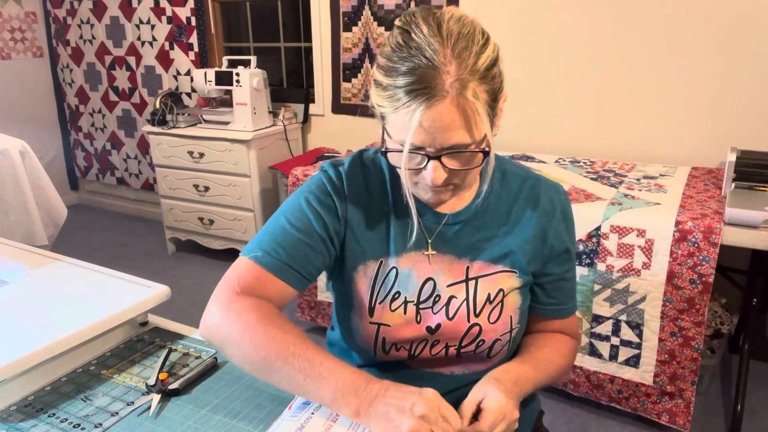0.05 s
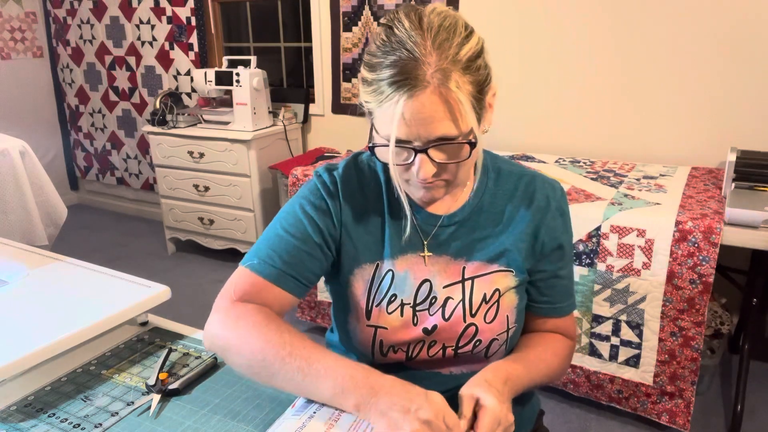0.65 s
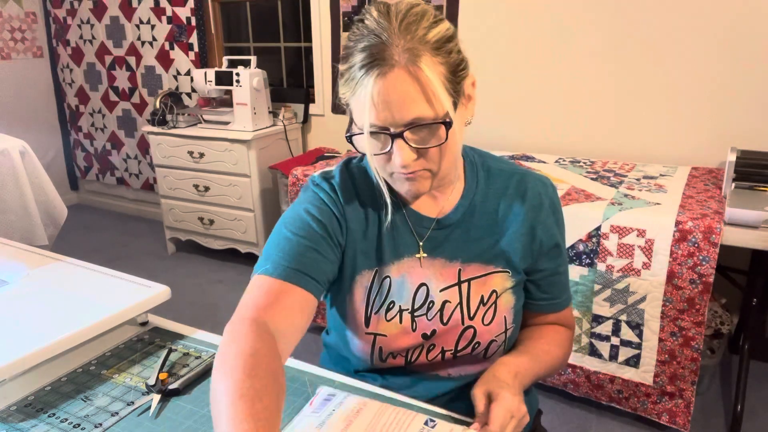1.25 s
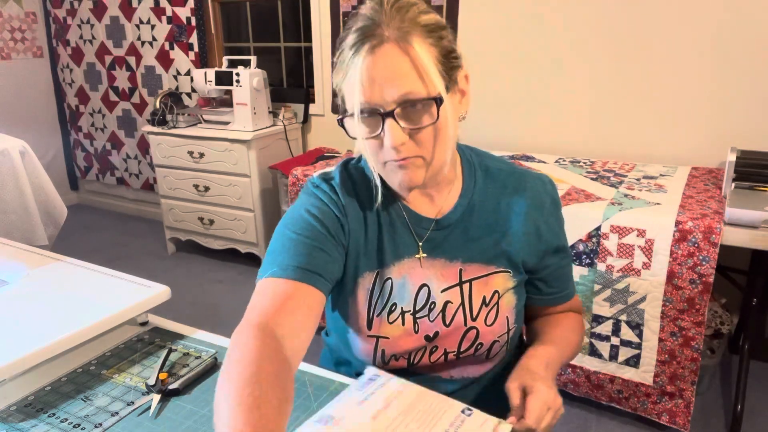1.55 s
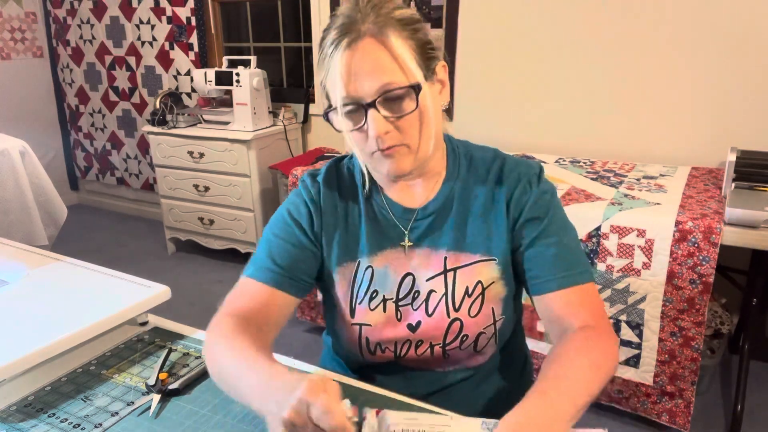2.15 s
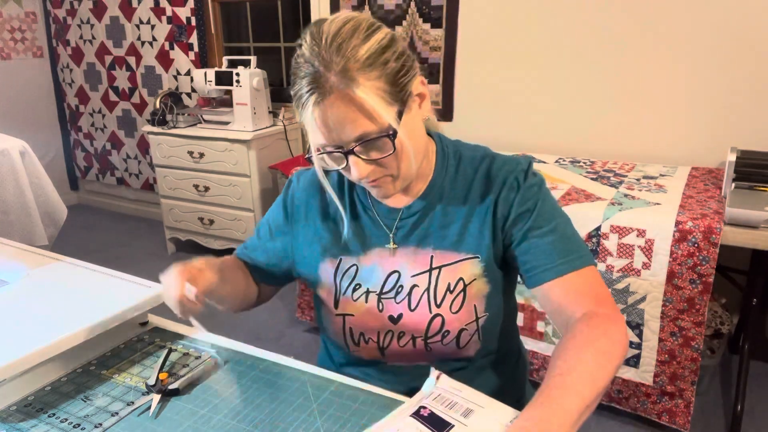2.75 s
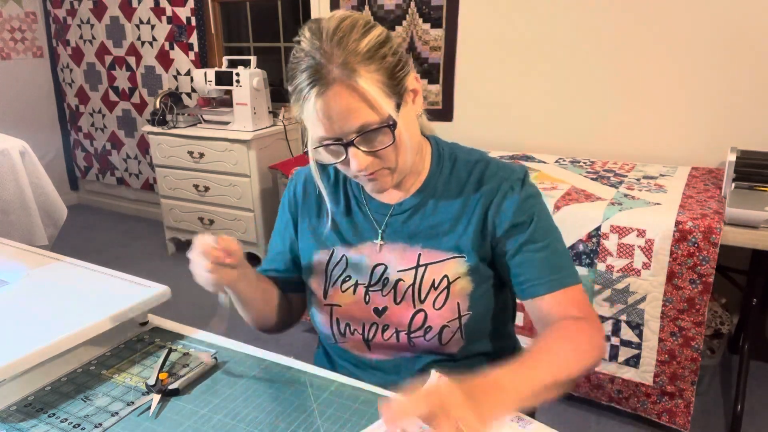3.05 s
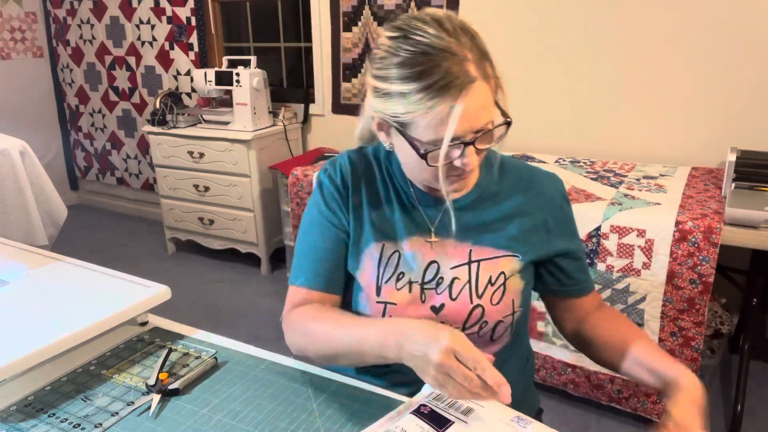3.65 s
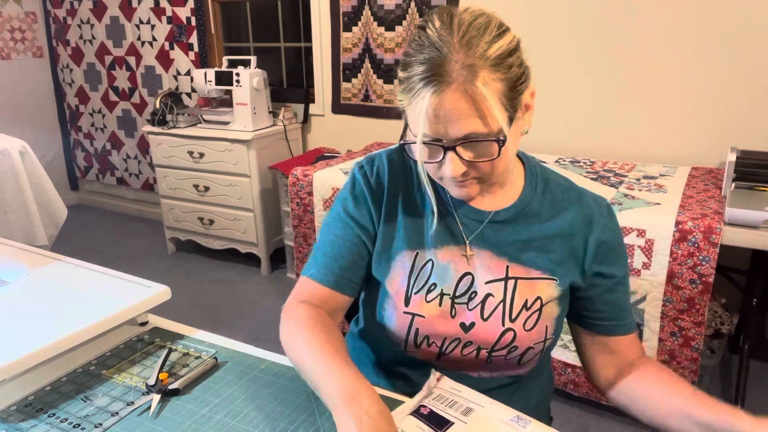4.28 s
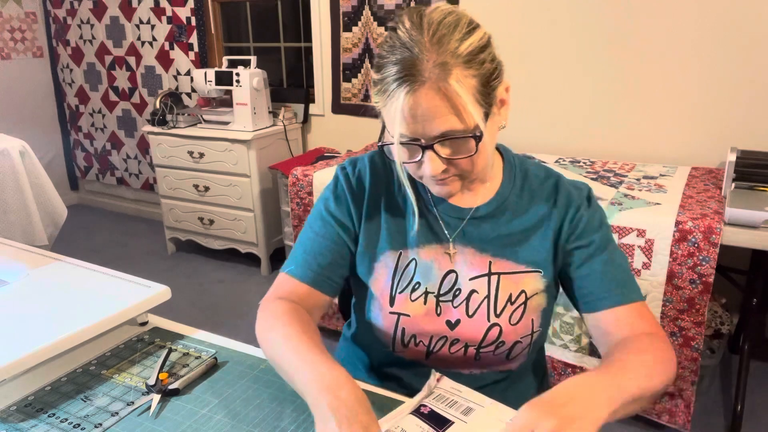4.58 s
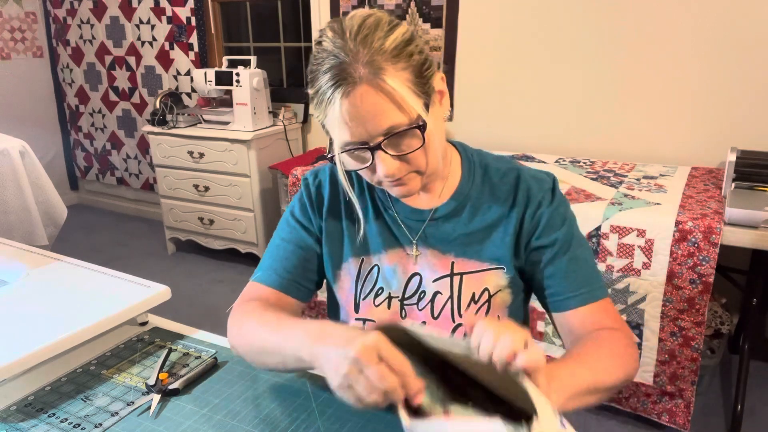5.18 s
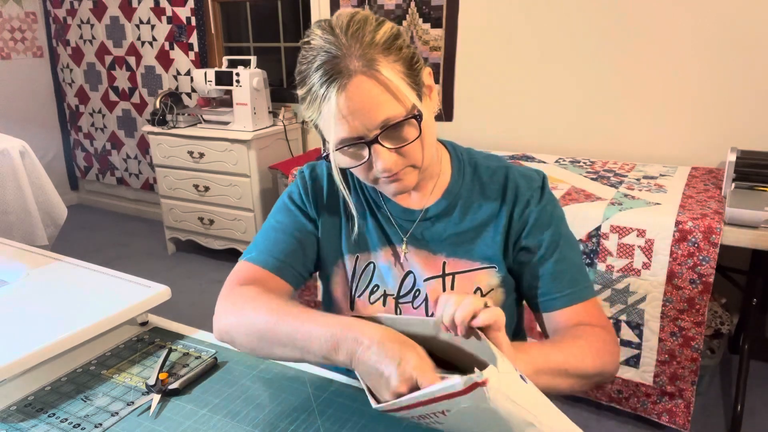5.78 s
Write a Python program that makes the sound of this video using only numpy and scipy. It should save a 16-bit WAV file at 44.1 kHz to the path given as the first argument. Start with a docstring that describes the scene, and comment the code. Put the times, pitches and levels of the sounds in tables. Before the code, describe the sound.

Close microphones in a small, quiet room pick up a stiff paper mailer being handled. It rustles, scrapes over a mat and is turned, bumping the table. One short, crackling rip with a zipping ring removes the tear strip. After a lull with a few light ticks, a hand lands on the table, then the paper crackles and pops hollowly as fingers work it open.

```python
"""Fingers rub a stiff paper mailing envelope, slide it across a cutting mat and turn it.
They draw its tear strip taut and rip it off in one pull, which sets the strip ringing.
Next the strip is crumpled, and a hand lands on the table with a thud and a fingernail click.
Last, fingers pry the envelope open: its creases snap and its walls buckle with hollow pops.
All this is heard in a small furnished room, through two microphones set close together."""
import sys
import numpy as np
from scipy import signal
from scipy.fft import rfft, irfft
from scipy.io import wavfile
from scipy.ndimage import uniform_filter1d

SR = 44100
rng = np.random.default_rng(int(sys.argv[2]) if len(sys.argv) > 2 else 0)


def generate_wav(signal):
    """Clip the signal to [-1, 1] and save it as 16-bit WAV at the path in sys.argv[1]."""
    frames = np.transpose(np.atleast_2d(signal))
    scaled = np.clip(frames, -1, 1) * 32767
    pcm = np.round(scaled).astype(np.int16)
    wavfile.write(sys.argv[1], SR, pcm)


N = 261072
TIME = np.arange(N) / SR
BINS = np.arange(N // 2 + 1) * SR / N
BODY_TOP_HZ, HISS_FROM_HZ, CUTOFF_HZ = 400, 5000, 15900   # three bands: low body, middle rasp, high hiss


def from_db(db):
    """Turn decibels into a gain."""
    return 10 ** (np.asarray(db) / 20)


def rms_one(x):
    """Scale a sound to an average strength (rms) of 1."""
    return x / np.sqrt(np.mean(x ** 2) + 1e-20)


def add(out, s, sound):
    """Mix a sound in at s seconds."""
    i = int(s * SR)
    out[i:i + len(sound)] += sound[:N - i]


def gains_in_time(rows):
    """Make one gain curve per dB column, silent outside the rows."""
    s, *columns = np.transpose(rows)
    return [from_db(np.interp(TIME, s, c, left=-150, right=-150)) for c in columns]


def at_hz(points, hz):
    """Read every column of a table on a log-frequency axis."""
    f, *columns = np.transpose(points)
    return [np.interp(np.log(hz + 1), np.log(f), c) for c in columns]


def butter(x, hz, kind, order=2):
    """Keep the lows, the highs or one band of a sound."""
    sections = signal.butter(order, np.clip(hz, 10, .45 * SR), kind, fs=SR, output="sos")
    return signal.sosfilt(sections, x + 1e-18)


def narrow_band(x, hz, width):
    """Keep only what lies close to one pitch."""
    return signal.lfilter(*signal.iirpeak(hz, hz / width, fs=SR), x + 1e-18)


def coloured(x, spectrum, low=0, high=CUTOFF_HZ):
    """Give a sound a tone colour between low and high Hz, at rms 1."""
    inside = 1 / np.sqrt((1 + (low / (BINS + 1)) ** 12) * (1 + (BINS / high) ** 12))
    return rms_one(irfft(rfft(x) * from_db(at_hz(spectrum, BINS)[0]) * inside, N))


def ring(clicks, hz, t60):
    """Each click starts a pure tone; t60 is its ring time, the seconds it takes to fade by 60 dB."""
    decay, step = from_db(-60 / (t60 * SR)), 2 * np.pi * hz / SR
    return signal.lfilter([0, np.sin(step)], [1, -2 * decay * np.cos(step), decay ** 2], clicks + 1e-18)


def stroke(s, rise_s, hold_s, release_s, arch_db):
    """Gain of one hand movement: rise and release span 20 dB, and arch_db bends the middle."""
    early, late = np.maximum(s - TIME, 0), np.maximum(TIME - s - hold_s, 0)
    arch = np.sin(np.pi * np.clip((TIME - s) / hold_s, 0, 1))
    return from_db(np.maximum(arch_db * arch - 20 * (early / rise_s + late / release_s), -200))


def sustained(curve, body_db, rasp_db, hiss_db):
    """One long movement drives body, rasp and hiss together."""
    return np.outer(from_db([body_db, rasp_db, hiss_db]), gains_in_time(curve)[0])


def friction(gains, colour, per_s, spread_db, smooth_db, flutter_db):
    """Fibres catch and let go in clumps of tiny clicks, over the smooth hiss of sliding."""
    sizes = from_db(spread_db * np.minimum(rng.exponential(1, N), 4)) * rng.choice([-1, 1], N)
    grains = rms_one(sizes * (rng.random(N) < per_s / SR))
    smooth = from_db(smooth_db) * rng.standard_normal(N)
    waver = rms_one(butter(rng.standard_normal(N), 130, "low"))
    drive = (grains + smooth) * from_db(flutter_db * np.clip(waver, -2, 2))
    edges = [0, BODY_TOP_HZ, HISS_FROM_HZ, CUTOFF_HZ]
    return sum(gain * coloured(drive, colour, lo, hi) for gain, lo, hi in zip(gains, edges, edges[1:]))


# The room's own noise. Each row: frequency in Hz, level in dB.
BACKGROUND_COLOUR = [(25, -9), (45, 1), (70, 1.5), (100, -11.5), (122, 1.5), (160, -14), (300, -14.5),
                     (600, -24), (1500, -30), (4000, -35), (10000, -42), (15500, -34)]
def background():
    """A faint, steady rumble fills the room."""
    return np.array([coloured(white, BACKGROUND_COLOUR) for white in rng.standard_normal((2, N))])


# Fingers and the strip rub the paper. Each row: time of full speed, rise and hold in seconds,
# rasp level in dB, brightness (hiss over rasp) in dB.
RUB_STROKES = [(0.0, .03, 0.69, -63.5, -8), (0.123, 0.046, 0.043, -44, 2.5),
               (0.374, 0.014, 0.026, -50, -14), (0.502, 0.03, 0.017, -50, -8),
               (0.688, 0.026, 0.02, -45.5, 7.5), (1.839, 0.2, 0.043, -57, 3),
               (2.127, 0.019, 0.016, -42, -5), (2.34, 0.046, 0.015, -40, -3),
               (2.786, .05, 0.23, -62.5, -12.5), (2.896, .01, 0.026, -53.5, -7),
               (3.124, .03, 0.076, -84.5, 4), (3.223, 0.013, 0.026, -57.5, -3),
               (3.341, 0.042, 0.072, -81.5, 12.5), (3.641, 0.0082, 0.0089, -67, -3),
               (4.039, 0.0071, 0.028, -63, -7), (4.117, 0.023, 0.082, -54, -6.5),
               (4.284, 0.04, 0.03, -51.5, -0.5), (4.429, 0.041, 0.036, -56.5, -3),
               (4.48, 0.053, 0.2, -72, -7.5), (4.61, .015, 0.066, -75.5, 10),
               (4.678, 0.011, 0.059, -58, -4), (4.772, 0.028, 0.014, -48.5, -9.5),
               (4.827, 0.013, 0.03, -39, -3.5), (4.946, 0.017, 0.012, -51.5, 1.5),
               (5.025, 0.048, 0.071, -46, -6), (5.165, 0.014, 0.029, -47.5, -32),
               (5.18, 0.0055, 0.029, -48, -2), (5.61, 0.044, 0.041, -50.5, 4.5),
               (5.832, 0.12, 0.027, -45, -8)]
def rub_gains():
    """Body, rasp and hiss gains of the rubs; a flat finger gives less hiss and more body."""
    power = np.zeros((3, N))
    for s, rise_s, hold_s, db, bright_db in RUB_STROKES:
        bands = from_db([db - 10.5 - .4 * bright_db, db, db + bright_db])
        power += np.outer(bands, stroke(s, rise_s, hold_s, release_s=.044, arch_db=-.8)) ** 2
    return np.sqrt(power)


# The tone of rubbed paper. Each row: frequency in Hz, level in dB.
RUSTLE_COLOUR = [(30, -12.5), (60, -4), (120, -1.5), (220, -5.5), (340, -13), (480, -5), (1000, -0.5),
                 (1550, 2.5), (2000, -1.5), (2800, -4), (4200, -7.5), (7000, -13), (10500, -13.5),
                 (14000, -11.5)]
def rustle(gains):
    """The paper's fibres catch and slip as it is handled."""
    return friction(gains, RUSTLE_COLOUR, per_s=920, spread_db=2, smooth_db=-.5, flutter_db=2.5)


# The envelope's gliding tones. Each row: start and length in seconds, first pitch, last pitch
# and pitch blur in Hz, level in dB.
ENVELOPE_TONES = [(0.104, .11, 1450, 1558, 276, -43.5), (0.9, .21, 870, 978, 35, -35.5),
                  (0.955, 0.22, 1656, 1890, 130, -50), (1.838, 0.063, 3020, 2490, 240, -52),
                  (2.288, 0.14, 1450, 1504, 120, -47.5), (2.391, 0.3, 1515, 1547, 55, -42.5),
                  (2.721, .39, 1530, 1484, 101, -62.5), (3.879, .08, 1056, 1140, 161, -74.5),
                  (4.269, 0.045, 1393, 1550, 500, -48)]
def envelope_tones():
    """The rubbed envelope resonates in narrow, breathy tones that glide in pitch."""
    out = np.zeros(N)
    for s, length, first_hz, last_hz, blur_hz, db in ENVELOPE_TONES:
        count = int(length * SR)
        phase = 2 * np.pi * np.cumsum(np.linspace(first_hz, last_hz, count)) / SR
        wobble = rms_one(butter(rng.standard_normal((2, count)), blur_hz, "low"))
        tone = wobble[0] * np.cos(phase) + wobble[1] * np.sin(phase)
        add(out, s, from_db(db) * np.hanning(count) * tone)
    return out


def burst(low_hz, high_hz, t60, sharpness):
    """A sharp crack, then a short shiver of the sheet."""
    t = TIME[:SR // 10]
    shiver = rng.standard_normal(len(t)) * 1000 ** (-t / t60)
    shiver[8] += sharpness
    sound = butter(butter(shiver, low_hz, "high", order=1), high_hz, "low")
    sound = butter(sound, max(260, low_hz / 4), "high")   # a small crease makes no bass
    return sound / np.sqrt(np.sum(sound ** 2) / (.005 * SR))


# The main creases. Each row: start in seconds, crack level in dB, pitch in Hz, tick level in dB.
CREASE_SNAPS = [(.115, -34, 2230, -44), (.2435, -48, 2330, -68), (.327, -58, 1480, -76),
                (.3587, -42, 1120, -61), (.3707, -39, 1340, -50.5), (.4105, -46.5, 1510, -62),
                (.6273, -51.5, 1500, -72), (.68, -38, 3000, -54), (.698, -32, 600, -52),
                (1.124, -25, 1000, -52), (1.1275, -24, 1060, -55), (1.336, -37, 2800, -49),
                (1.9597, -35.5, 1310, -56), (2.1228, -41, 750, -62), (2.1354, -34, 850, -45),
                (2.222, -41, 940, -56), (2.348, -43, 1510, -46), (2.368, -45, 1510, -50),
                (2.535, -20, 3820, -22), (2.7107, -29, 1490, -33.5), (2.8236, -72, 2000, -53),
                (2.8904, -45.5, 1700, -58), (2.902, -45, 940, -72), (2.938, -47, 1000, -61),
                (3.0067, -64, 4530, -51), (3.153, -81.5, 4000, -71), (3.2226, -42, 3500, -61),
                (3.225, -51, 900, -75), (3.2523, -42, 3870, -66), (3.492, -80, 4050, -64),
                (3.5136, -81, 4000, -65.5), (3.6446, -63.5, 2300, -60), (4.0375, -56, 989, -70),
                (4.0964, -50.5, 1090, -85), (4.112, -46, 805, -80), (4.1178, -43, 740, -40.5),
                (4.313, -48, 1300, -49), (4.6771, -45.5, 1630, -45.5), (4.7105, -57, 4000, -46.5),
                (4.783, -46, 1800, -51), (4.8331, -38, 1770, -35), (4.8395, -39, 1550, -49),
                (4.857, -36.5, 1460, -49), (4.8645, -39, 2800, -44), (4.8901, -41, 2000, -52),
                (4.903, -39.5, 1450, -60), (4.9972, -37, 2410, -41.5), (5.0365, -41.5, 2800, -46),
                (5.0545, -44, 2800, -40), (5.1802, -33.5, 2300, -42), (5.188, -40, 2200, -45),
                (5.261, -39, 1450, -72), (5.282, -45, 4000, -42), (5.3685, -32, 1700, -44.5),
                (5.4205, -41.5, 1400, -49), (5.478, -37.5, 1490, -53), (5.5203, -36, 1880, -56),
                (5.6145, -49, 1500, -37), (5.6429, -31.5, 2040, -43), (5.6475, -32.5, 1640, -36),
                (5.6605, -37, 1600, -43), (5.7225, -58, 3500, -53), (5.749, -43.5, 800, -42.5),
                (5.7875, -61, 3500, -37.5), (5.799, -42, 1360, -60), (5.833, -42, 2650, -58),
                (5.8598, -36, 3280, -41), (5.867, -35, 870, -56)]
def snaps(small_snaps, ring_cycles=15):
    """Creases flip: a woody crack, a brief note from the paper beside it, and a bright tick."""
    out, t = np.zeros(N), TIME[:SR // 10]
    for s, crack_db, hz, tick_db in CREASE_SNAPS + small_snaps:
        note = from_db(-3.5 - 60 * t * hz / ring_cycles) * np.sin(2 * np.pi * hz * t)
        crack = burst(hz / 1.11, hz * 1.11, t60=.01, sharpness=7)
        tick = burst(4300, CUTOFF_HZ, t60=.0028, sharpness=4.5)
        add(out, s, from_db(crack_db) * (crack + note) + from_db(tick_db) * tick)
    return out


def crinkles(rasp, count=200, per_s=10, hz=2036, spread_db=4):
    """Rows for snaps(): small creases flip at random, as strongly as the paper is rubbed."""
    crack_offset, tick_offset = spread_db * rng.standard_normal((count, 2)).T
    when = np.cumsum(rng.exponential(1, count)) / per_s
    crack_db = 20 * np.log10(np.interp(when, TIME, rasp) + 1e-9) - 3.5 + crack_offset
    tick_db = crack_db - 8 + tick_offset
    return [(s, crack, hz, tick) for s, crack, tick in zip(when, crack_db, tick_db) if s < TIME[-1]]


# Blows on the table. Each row: start in seconds, level in dB, contact time in seconds.
TABLE_BLOWS = [(0.121, -48, 0.0065), (.374, -45.5, .002), (0.777, -27, .011), (1.968, -39.5, .005),
               (2.1237, -22.5, 0.0059), (2.541, -36, 0.003), (2.943, -48.5, 0.0039), (3.228, -50, 0.0036),
               (4.1187, -22, 0.0012), (4.1437, -31.5, 0.0014), (4.168, -35.5, 0.0024), (5.868, -34, 0.0011),
               (5.884, -36.5, 0.0016)]
# The table top's notes. Each row: pitch in Hz, level in dB, ring time in seconds.
TABLE_NOTES = [(52.15, -17, 0.7), (121, -0.5, 0.11), (167.7, -4, 0.13), (201.8, -1, 0.096),
               (281, -11, 0.16), (322.3, -15.5, 0.086), (410, -24, 0.088), (744, -13, 0.074)]
def table_knocks(thud_db=-11, thud_t60=.075):
    """Soft pushes ring the table top, with a dull thud from the mat."""
    pushes, thuds, t = np.zeros(N), np.zeros(N), TIME[:SR // 4]
    for s, db, contact_s in TABLE_BLOWS:
        push = np.hanning(int(contact_s * SR) + 3)
        add(pushes, s, from_db(db) * push / push.sum())
        thud = rms_one(butter(rng.standard_normal(len(t)), [90, 258], "band", order=3))
        add(thuds, s, from_db(db + thud_db) * thud * 1000 ** (-t / thud_t60))
    notes = sum((-1) ** k * from_db(db) * ring(pushes, hz, t60)
                for k, (hz, db, t60) in enumerate(TABLE_NOTES))
    return thuds + .73 * notes


# The envelope's walls buckle. Each row: start in seconds, level in dB, a pitch in Hz that the pop
# falls through.
WALL_BUCKLES = [(0.37, -39.5, 550), (.762, -17.5, 449), (.772, -22, 304), (1.1228, -14.5, 783),
                (1.195, -22.5, 710), (1.212, -30, 445), (1.961, -43.5, 466), (2.699, -38, 435),
                (2.712, -27.5, 395), (2.943, -46, 379), (3.253, -45, 768), (4.679, -42, 475),
                (4.947, -35.5, 638), (5.1448, -33.5, 650), (5.155, -34, 755), (5.24, -28.5, 404),
                (5.293, -28.5, 417), (5.369, -28, 447), (5.644, -24.5, 807)]
def buckles(rise_s=.0005, fall_s=.009, roughness=.53, ring_cycles=32):
    """Short bending waves run ahead of long ones, so each pop falls in pitch."""
    out, t = np.zeros(N), TIME[:SR // 6]
    for s, db, hz in WALL_BUCKLES:
        t60 = min(ring_cycles / hz, .06)   # the holding hand damps the wall
        phase = 2 * np.pi * np.cumsum(1.579 * hz / (1 + t / fall_s)) / SR
        rattle = rms_one(butter(rng.standard_normal(len(t)), [hz / 2, hz * 2], "band"))
        gain = from_db(db - 60 * t / t60) * (1 - np.exp(-t / rise_s))
        add(out, s, gain * (np.sin(phase) + roughness * rattle))
    return butter(out, 190, "high")


def puffs(level_db=-11, t60=.13):
    """Each buckling wall pushes out a short, dull puff of air."""
    out, t = np.zeros(N), TIME[:SR // 4]
    for s, db, hz in WALL_BUCKLES:
        air = rms_one(butter(rng.standard_normal(len(t)), [109.2, 325.5], "band", order=3))
        size = min(450 / hz, 1) ** 2   # small, high-pitched panels push less air
        add(out, s, from_db(db + level_db - 60 * t / t60) * size * air)
    return out


# Each row: time of full speed, rise and hold in seconds, rasp level in dB, then body and hiss
# in dB compared with the rasp.
SLIDE_STROKES = [(0.707, 0.017, 0.089, -31, -13.5, -9.5), (0.905, 0.074, 0.3, -33.5, -9, -7.5),
                 (1.268, 0.045, 0.17, -38, -7.5, -7.5)]
# The tone of paper on the mat. Each row: frequency in Hz, level in dB.
MAT_COLOUR = [(40, -15), (70, 2), (130, 1), (220, 3), (340, -10.5), (460, -3.5), (620, -4), (920, -4),
              (1500, -2), (2300, -7), (3000, -7), (4200, -13.5), (7000, -15.5), (10500, -15.5),
              (13500, -14), (15500, -17)]
def slide():
    """The envelope rubs over the mat, swelling in the middle of each shove."""
    gains = np.zeros((3, N))
    for s, rise_s, hold_s, db, body_db, hiss_db in SLIDE_STROKES:
        bands = from_db([db + body_db, db, db + hiss_db])
        gains += np.outer(bands, stroke(s, rise_s, hold_s, release_s=.049, arch_db=4.5))
    return friction(gains, MAT_COLOUR, per_s=3200, spread_db=2.3, smooth_db=.5, flutter_db=1.5)


# Each row: time in seconds, rubbing level in dB.
TURN_LEVELS = [(1.48, -54), (1.534, -57), (1.652, -51.5), (1.75, -58), (1.97, -47), (2.012, -58),
               (2.03, -46.5), (2.11, -69)]
def turn_gains():
    """The envelope rubs as it is swung round on the mat."""
    return sustained(TURN_LEVELS, body_db=-12.5, rasp_db=0, hiss_db=-5)


# Each row: time in seconds, rubbing level in dB.
GRIP_LEVELS = [(2.15, -49), (2.17, -48), (2.304, -48.5), (2.354, -43), (2.404, -50.5), (2.495, -38.5),
               (2.53, -36.5)]
def grip_gains():
    """The strip rubs as it is gripped and drawn taut."""
    return sustained(GRIP_LEVELS, body_db=-10, rasp_db=-1, hiss_db=-3)


# The course of the tear. Each row: time in seconds, then body, rasp and hiss levels in dB.
TEAR_LEVELS = [(2.526, -52.5, -44.5, -45.5), (2.541, -38, -26.5, -36), (2.592, -45.5, -28.5, -32),
               (2.634, -49, -28, -30.5), (2.682, -44, -34, -33.5), (2.712, -32, -31, -46.5),
               (2.724, -34.5, -48, -55), (2.77, -47.5, -69, -74)]
# The tone of tearing. Each row: frequency in Hz, level in dB.
FIBRE_COLOUR = [(30, -22), (70, 0.5), (130, -1), (220, 2), (340, -13), (460, -2), (1000, 0.5), (1500, 5),
                (2800, 4), (4200, -5.5), (7000, -12.5), (10500, -10), (13500, -6), (15500, -16.5)]
def tear():
    """Fibres part along the strip in a dense crackle."""
    gains = gains_in_time(TEAR_LEVELS)
    return friction(gains, FIBRE_COLOUR, per_s=1500, spread_db=-.4, smooth_db=-9.5, flutter_db=1)


# The taut strip's notes. Each row: pitch in Hz, width in Hz (wider fades sooner), level in dB.
STRIP_NOTES = [(2090, 80, -11.5), (2367, 40, -4), (2436, 64, -3), (2647, 70, -2.5), (2824, 60, -3.5),
               (2908, 65, 3), (3173, 50, -9), (3550, 130, -11.5)]
# The two surges of the pull. Each row: time of full strength and hold in seconds, level in dB.
PULL_SURGES = [(2.551, .028, -32), (2.598, .05, -29)]
def rip(slips_per_s=260, jitter=.35, spread_db=3, rise_s=.008):
    """The strip gives way in quick, uneven slips, and each one rings its notes."""
    gaps, sizes = rng.standard_normal((200, 2)).T
    when = PULL_SURGES[0][0] - rise_s + np.cumsum(np.exp(jitter * gaps)) / slips_per_s
    slips = np.zeros(N)
    slips[np.minimum(when * SR, N - 1).astype(int)] = from_db(spread_db * sizes)
    tone = sum(from_db(db) * np.sqrt(width) * ring(slips, hz, np.log(1000) / np.pi / width)
               for hz, width, db in STRIP_NOTES)
    loudness = np.sqrt(np.abs(uniform_filter1d(tone ** 2, size=1100)) + 1e-6)
    effort = sum(from_db(db) * stroke(s, rise_s, hold_s, release_s=.049, arch_db=2)
                 for s, hold_s, db in PULL_SURGES)
    return effort * tone / loudness   # the hand, not chance, sets the strength


def last_fibres(start_s=2.694, length_s=.0078, count=7, crack_db=-35, hz=3140, tick_db=-34.5):
    """Rows for snaps(): the end of the strip lets go, fibre by fibre."""
    when = start_s + length_s * (np.arange(count) + rng.random(count)) / count
    return [(s, crack_db, hz, tick_db) for s in when]


# The strip springs free or is flicked. Each row: start in seconds, level in dB.
STRIP_FLICKS = [(2.699, -31.5), (3.2228, -47), (3.2524, -41), (3.6447, -79)]
def flicks(slack_damping=2.3, spread_db=.5):
    """The loose strip rings briefly, with a slightly different mix of notes each time."""
    s, db = np.transpose(STRIP_FLICKS)
    shares = from_db(spread_db * rng.standard_normal((len(s), len(STRIP_NOTES))))
    out = np.zeros(N)
    for k, (hz, width, note_db) in enumerate(STRIP_NOTES):
        taps = np.zeros(N)
        taps[(s * SR).astype(int)] = from_db(db + note_db) * shares[:, k]
        out += ring(taps, hz, np.log(1000) / (np.pi * width * slack_damping))
    return out


# Each row: pitch in Hz, level in dB, ring time in seconds.
NAIL_NOTES = [(3300, -51, 0.02), (3990, -24.5, 0.01), (4240, -39, 0.01), (6500, -40, 0.0073),
              (8950, -45, 0.012)]
def nail(start_s=4.1175):
    """A fingernail meets the table with one hard, high click."""
    click = np.zeros(N)
    click[int(start_s * SR)] = 1
    return sum(from_db(db) * ring(click, hz, t60) for hz, db, t60 in NAIL_NOTES)


# Each row: time in seconds, rubbing level in dB.
PRY_LEVELS = [(4.85, -59), (4.914, -55), (4.998, -55.5), (5.23, -50.5), (5.598, -50), (5.92, -51.5)]
def pry_gains():
    """Fingers rub their way into the envelope."""
    return sustained(PRY_LEVELS, body_db=-3, rasp_db=-.5, hiss_db=-6.5)


# Each row: centre of a dip in Hz, width in Hz, level change in dB.
TABLE_DIPS = [(368, 50, -6.5), (1195, 130, -7), (1669, 100, -5.5), (10750, 2100, -2.5)]
def table_bounce(x):
    """Sound off the table top meets the direct sound and partly cancels narrow bands."""
    for hz, width, db in TABLE_DIPS:
        x = x + (from_db(db) - 1) * narrow_band(x, hz, width)
    return x


# Each row: frequency in Hz, the room's ring time in seconds.
ECHO_TIMES = [(100, 0.42), (400, 0.24), (1500, 0.18), (5000, 0.17), (14000, 0.15)]
def reflections(early_db, early_t60, tail_db, gap_s):
    """Stereo echoes from one spot: quick ones off table and body, then a short tail."""
    t = TIME[:SR // 3]
    edges = np.geomspace(130, 18000, 8)
    tail = 0
    for low, high in zip(edges, edges[1:]):
        t60 = at_hz(ECHO_TIMES, np.sqrt(low * high))[0]
        tail += butter(rng.standard_normal((2, len(t))), [low, high], "band") * 1000 ** (-t / t60)
    tail *= 1 - np.exp(-(t / gap_s) ** 2)
    early_fade = (t > .0006) * 1000 ** (-t / early_t60)
    early = butter(rng.standard_normal((2, len(t))) * early_fade, 250, "high")
    return sum(from_db(db) * part / np.linalg.norm(part, axis=1, keepdims=True)
               for db, part in [(early_db, early), (tail_db, tail)])


# Standing waves, the room's own notes. Each row: pitch in Hz, width in Hz, dB over the direct sound.
ROOM_NOTES = [(57.7, 33, -1.5), (125.9, 15, 0.5), (174, 14, -3), (218, 24, -5), (309, 17, 5),
              (439, 34, 6.5), (672, 36, -3)]
def room(x, early_db, early_t60, tail_db, gap_s, spots):
    """The sound wanders over the envelope, so its echoes keep changing; the room's notes stay."""
    shares = butter(rng.standard_normal((spots, N)), 14, "low")
    shares /= np.linalg.norm(shares, axis=0)
    echoes = 0
    for share in shares:
        response = reflections(early_db, early_t60, tail_db, gap_s)
        echoes += signal.oaconvolve((x * share)[None], response, axes=1)[:, :N]
    standing = sum(from_db(db) * narrow_band(x, hz, width) for hz, width, db in ROOM_NOTES)
    return (x + standing + echoes) / np.sqrt(1 + from_db(early_db) ** 2 + from_db(tail_db) ** 2)


def scene():
    """Mix all that the hands do and place it in the room."""
    fingers = np.sqrt(rub_gains() ** 2 + turn_gains() ** 2 + grip_gains() ** 2 + pry_gains() ** 2)
    rubbing = from_db(-.64) * rustle(fingers) + from_db(-1.93) * slide()
    tearing = from_db(-2.1) * tear() + rip()
    creases = from_db(-1.5) * snaps(last_fibres() + crinkles(rasp=fingers[1]))
    pops = from_db(-2) * buckles() + puffs()
    knocks = from_db(-.5) * table_knocks()
    paper = table_bounce(rubbing + tearing + pops + envelope_tones())
    rumble = from_db(-69) * background()
    clicks = table_bounce(creases + flicks() + nail())
    sharp = room(clicks, early_db=-1.5, early_t60=.026, tail_db=-6.5, gap_s=.006, spots=2)
    soft = room(paper + knocks, early_db=-1.5, early_t60=.036, tail_db=-8, gap_s=.0057, spots=4)
    return soft + sharp + rumble


# Each row: frequency in Hz, how far the right side leads in radians, left over right in dB,
# how much the sides share from 0 to 1.
MICROPHONE_PAIR = [(58.8, -0.5, 1.5, 0.4), (193, 0.76, 6, 0.3), (536.6, 1.36, -3.5, .35),
                   (972, 0.08, 5, .3), (1157.4, 0.73, -1.5, 0.2), (1700, 1.51, 0.5, 0.23),
                   (3000, 1.76, 0.5, 0), (5130, 3, -1.5, 0), (7380, 1.85, -3, 0), (9600, -0.5, 1.5, 0.94),
                   (10900, 1, -1.5, 0.9), (11900, -1.65, 1.5, .2), (13900, -3, -2, 0.95),
                   (15570, -3.1, 1, 0.95)]
def record(dry):
    """Two close microphones share part of the sound; timing and level differences give it width."""
    lead, balance_db, shared = at_hz(MICROPHONE_PAIR, BINS)
    left, right = rfft(dry)
    blend = np.clip(shared, 0, 1) * np.pi / 2
    right = (np.sin(blend) * left + np.cos(blend) * right) / np.sqrt(1 + np.sin(2 * blend) / 2)
    tilt = from_db(balance_db / 2) * np.exp(-.5j * lead)
    pair = irfft(np.array([left * tilt, right / tilt]), N)
    pair = butter(pair, 28, "high", order=3)
    return signal.sosfilt(signal.ellip(10, .2, 80, CUTOFF_HZ, fs=SR, output="sos"), pair)


dry = scene()
out = record(dry)
generate_wav(out)
```